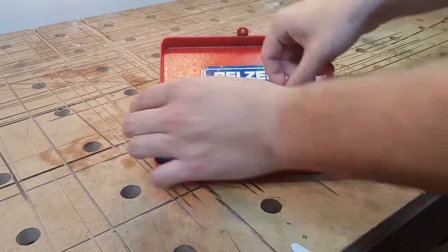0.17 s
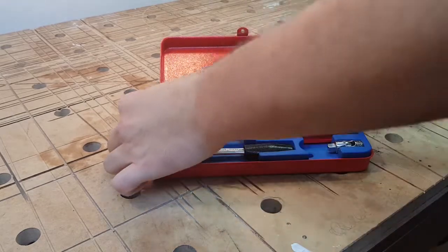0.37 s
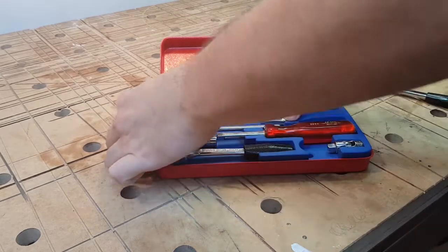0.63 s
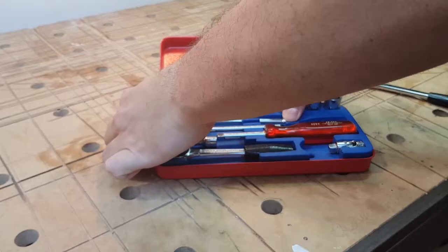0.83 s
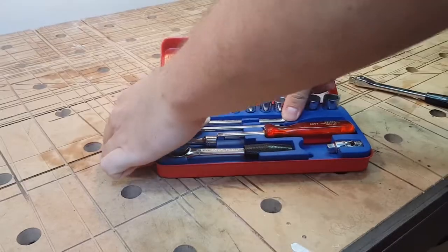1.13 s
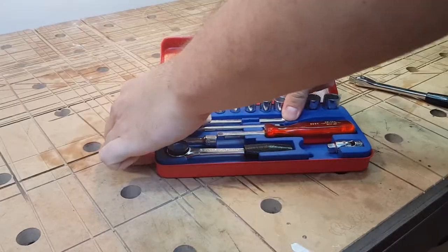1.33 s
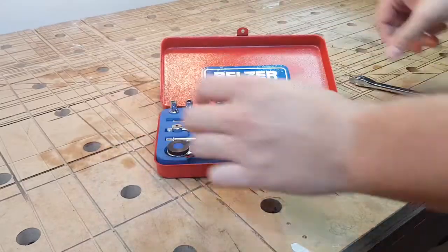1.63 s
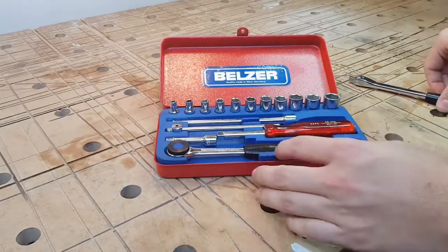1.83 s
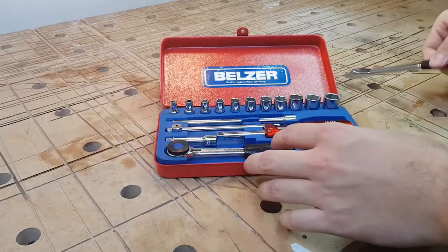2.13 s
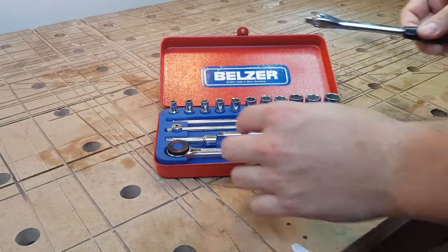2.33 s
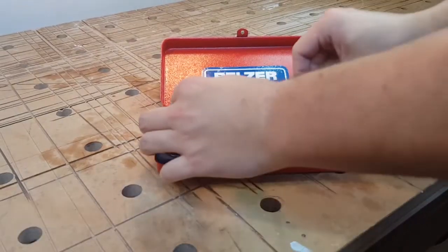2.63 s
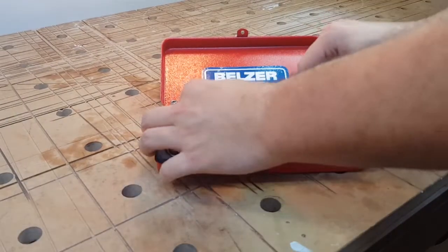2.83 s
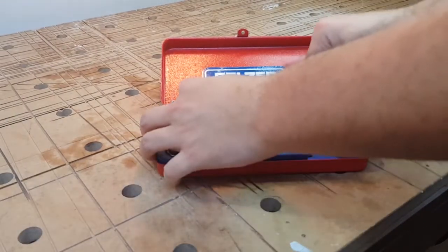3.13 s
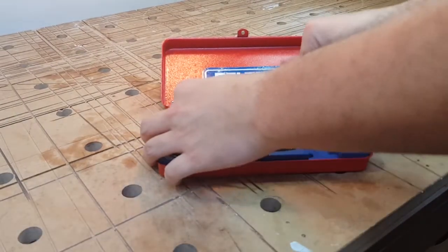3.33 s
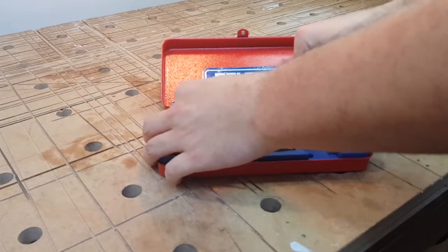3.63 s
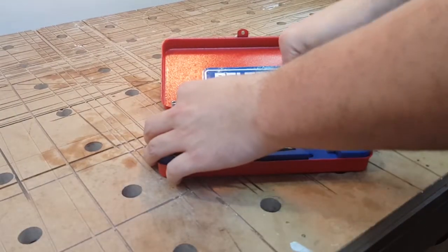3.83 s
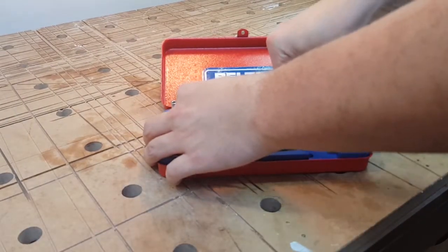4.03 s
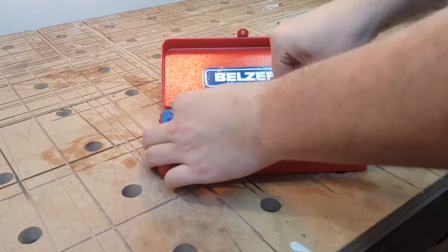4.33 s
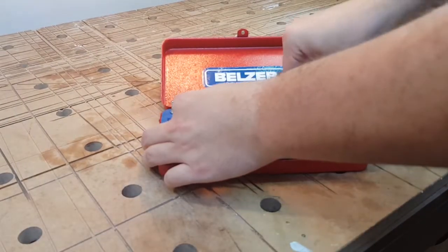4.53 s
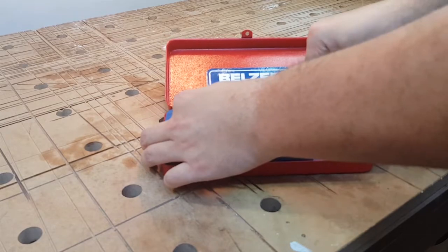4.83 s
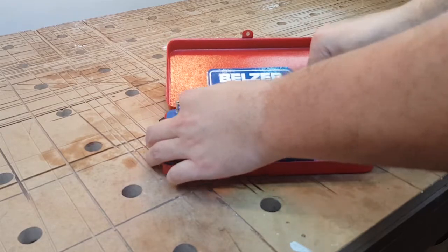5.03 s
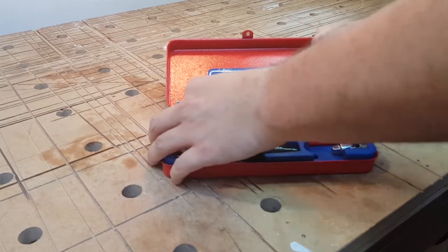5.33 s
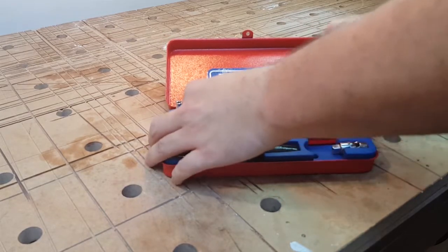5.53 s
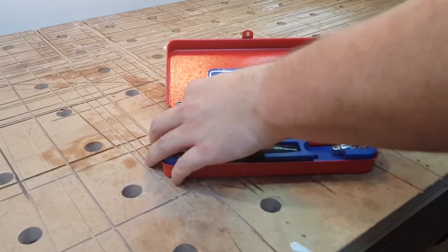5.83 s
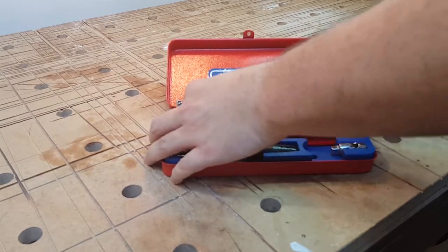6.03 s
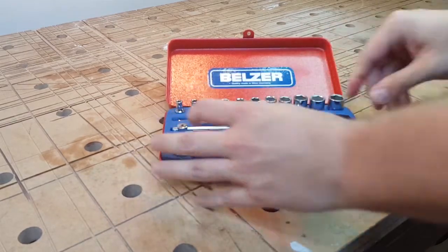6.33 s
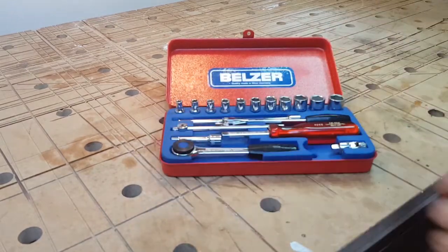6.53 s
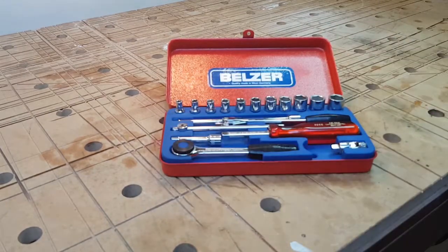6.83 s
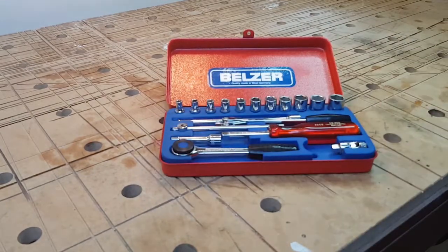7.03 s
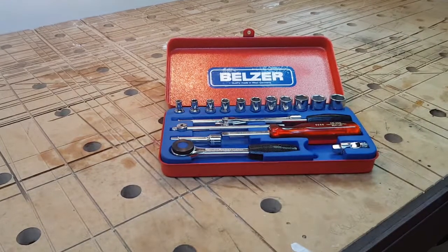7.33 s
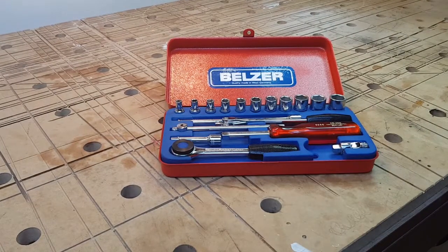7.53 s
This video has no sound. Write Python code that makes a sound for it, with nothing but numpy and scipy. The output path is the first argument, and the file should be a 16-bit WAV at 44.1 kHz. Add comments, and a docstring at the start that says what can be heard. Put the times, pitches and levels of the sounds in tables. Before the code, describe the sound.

Sparse workshop handling: a tin tool case bumps wood, a driver knocks, steel pieces clatter sharply, and tools quietly snap into a plastic tray.

```python
"""Steel sockets and a ratchet click and scrape in the plastic tray of a tin case on a wooden bench.
Each contact is a noisy force that rings bench, case, lid, handles, tray and steel; parts near its pitch
answer most. The case bumps the bench, a driver is lifted, and one tool drops onto the others: a bright
clatter of steel modes. Behind: skin brushing (swelling noise), one stick-slip squeak (wavering tone),
and a small workshop's shaped-noise rumble and hiss with faint hum tones."""
import sys
import numpy as np
from scipy import signal
from scipy.fft import rfft, irfft
from scipy.io import wavfile
from scipy.ndimage import uniform_filter1d

SR = 44100
rng = np.random.default_rng(int(sys.argv[2]) if len(sys.argv) > 2 else 0)


def to_wav(s):
    """Save 16-bit WAV."""
    ch = np.atleast_2d(s).T  # columns
    pcm = np.round(np.clip(ch, -1, 1) * 32767)  # PCM
    wavfile.write(sys.argv[1], SR, pcm.astype(np.int16))


N = 339040  # samples in the scene
RING = 24576  # samples in one contact's response
RING_HZ, RING_S = np.fft.rfftfreq(RING, 1 / SR), np.arange(RING) / SR
SCENE_HZ, SCENE_S = np.fft.rfftfreq(N, 1 / SR), np.arange(N) / SR
SOUND_SPEED_M_S = 343
EDGE_HZ = 15900
CASE_FLOOR_HZ = 318  # the flat floor of the case drums when it lands
SCRAPE_TRIM_DB, CLINK_TRIM_DB = -1.45, -2.0  # added to those tables' levels

# Workshop air spectrum: [freq_hz, relative_density_db_per_hz]
AIR_SPECTRUM = [(12, -49), (20, -17), (48, -9), (107, -5.5), (158, -11.5), (210, -11), (262, -15.5),
                (301, -16.5), (485, -13.5), (527, -19.5), (590, -17), (759, -20.5), (1090, -22.5),
                (13500, -32), (16000, -33.5)]
AIR_LEVEL_DB = -57
# Workshop air, left-right likeness: [freq_hz, correlation]
AIR_LIKENESS = [(60, 0.9), (150, 0.93), (380, 0.62), (950, 0.21), (2380, 0.031), (5980, 0.077),
                (15000, 0.33)]
# Hum tones: [freq_hz, level_db]
HUM_TONES = [(60, -67.5), (100, -67), (300, -72)]

# Room decay: [freq_hz, t60_s]
ROOM_DECAY = [(60, 0.54), (300, 0.3), (1000, 0.26), (4000, 0.22), (9000, 0.25), (15000, 0.11)]
# Room tail, left-right likeness: [freq_hz, correlation]
ROOM_LIKENESS = [(100, 0.94), (300, 0.93), (600, 0.83), (1200, 0.53), (2500, 0.097), (15000, 0.12)]
# Room tail tone: [freq_hz, gain_db]
ROOM_TONE = [(60, -3.5), (150, -1), (320, -4), (700, 3), (2000, -2.5), (4500, -2), (15000, -1.5)]

# Broad resonances of each part: [freq_hz, width_hz, relative_db]
BENCH_RESONANCES = [(59, 21, -8), (88, 23, -9), (114.4, 28, -2.5), (136.6, 46, -5)]
CASE_RESONANCES = [(197, 36, -21), (220, 21, 4.5), (250, 50, 1), (324.7, 48, 4), (394, 46, -5)]
LID_RESONANCES = [(438.4, 54, 7.5), (494, 54, -0.5), (562, 78, -2)]
HANDLE_RESONANCES = [(777, 125, 1), (807, 140, -3), (1020, 190, 1), (1290, 146, -2.5)]
TRAY_RESONANCES = [(1470, 300, -16), (1730, 250, -2), (1970, 140, -2.5), (2303, 460, 0.5),
                   (2980, 380, -2.5)]
STEEL_RESONANCES = [(3530, 550, 1), (4020, 630, 2.5), (4800, 1700, 2.5), (5900, 1360, -1.5),
                    (8400, 1700, -3), (13000, 5000, -18)]
PARTS = (BENCH_RESONANCES, CASE_RESONANCES, LID_RESONANCES,
         HANDLE_RESONANCES, TRAY_RESONANCES, STEEL_RESONANCES)

# Hand brushes tin and wood: [start_s, length_s, peak_level_db]
BRUSH_STROKES = [(1.298, 0.53, -68), (2.35, .4, -65), (6.15, 0.65, -60.5), (6.73, 0.12, -55.5),
                 (7.567, 0.25, -61)]
# Skin hiss spectrum: [freq_hz, relative_density_db_per_hz]
SKIN_SPECTRUM = [(300, -2), (700, -11), (1300, -1), (3000, -1.5), (6000, -3.5), (9000, -6), (15000, -13)]
# Steel sticks and slips in its slot: [start_s, length_s, pitch_hz, level_db]
SQUEAK_EVENTS = [(4.723, 0.059, 3025, -61.5)]

# Driver handle knocks on the bench: [start_s, contact_s, pitch_hz, level_db]
DRIVER_KNOCK_EVENTS = [(1.901, .01, 420, -44), (1.922, 0.0043, 520, -66), (1.948, .004, 420, -52),
                       (2.1, 0.0081, 260, -47), (2.109, 0.0047, 915, -35.5), (2.13, 0.0022, 1720, -44.5)]
# Driver drags over the bench: [start_s, length_s, pitch_hz, level_db]
DRIVER_DRAG_EVENTS = [(1.877, 0.065, 453, -41.5), (2.011, 0.063, 430, -47), (2.162, 0.051, 2130, -59)]
# Colour of the driver's plastic handle: [freq_hz, gain_db]
DRIVER_TONE = [(100, -3), (210, -9), (340, 4.5), (450, 1), (650, 4), (1200, 2), (2250, 0.5), (2900, -7),
               (5000, -9)]

# Steel strikes steel:
# [start_s, struck_spot_pitch_hz, crack_db, small_socket_db, large_socket_db, ratchet_db]
CLINK_EVENTS = [(1.403, 12100, -68, -57, -72, -80), (2.672, 7000, -42, -60, -42, -39),
                (2.679, 1460, -27, -38, -35, -60), (2.703, 1500, -29.5, -24, -39, -56),
                (2.7094, 10500, -26, -22, -38, -53), (2.7205, 705, -33.5, -33, -48, -60),
                (2.7771, 6000, -33.5, -50, -63, -40), (2.784, 8100, -32, -34, -69, -67),
                (2.787, 4400, -34, -38, -60, -64), (4.3682, 8100, -43.5, -53, -76, -44.5)]
# Crack of steel on steel: [freq_hz, relative_density_db_per_hz]
CRACK_SPECTRUM = [(240, -37), (400, 0), (607, -16), (687, -5), (839, -16.5), (921, -12), (1200, -13.5),
                  (1460, -10.5), (2590, -15), (2970, -4), (3470, -20), (4310, -7.5), (10900, -16.5),
                  (13300, -15), (16000, -12.5)]
# Ringing modes of the steel pieces: [freq_hz, relative_db, t60_s]
SMALL_SOCKET_MODES = [(12450, -10, .02), (12931, -5, .05), (13015, -2, .045), (13078, 0, .035),
                      (13184, -1, .04), (13400, -3, .02), (13840, -8, .04), (14400, -7, .02)]
LARGE_SOCKET_MODES = [(2280, 1, 0.03), (4500, -15, 0.066), (6100, -28, .04), (9150, 0, 0.044),
                      (9330, 2, 0.068), (9900, -2, 0.044), (11690, -19.5, .08)]
RATCHET_MODES = [(1113, -5, 0.16), (2140, -27, .1), (3250, -13, .04), (4550, -13, 0.083),
                 (5870, 15.5, 0.04), (6040, 9.5, 0.14), (8080, -1, 0.15), (8100, 0, 0.12), (11700, -7, .12)]

# Case bumps the bench: [start_s, contact_s, pitch_hz, level_db, bench_thud_db]
BUMP_EVENTS = [(0.314, 0.0065, 885, -31.5, -49), (0.950, 0.0057, 1700, -31.5, -36),
               (0.957, 0.0027, 4650, -18.5, -34), (0.979, 0.0017, 400, -30, -48),
               (1.811, 0.0023, 3160, -39, -59), (2.682, 0.0082, 1400, -45, -60),
               (2.716, 0.0058, 750, -43, -43), (2.738, 0.0044, 200, -47, -44.5),
               (2.788, 0.0012, 480, -47.5, -65), (4.534, 0.012, 706, -45, -46.5),
               (4.549, 0.0047, 139, -50, -55), (5.813, 0.0045, 720, -40.5, -33.5),
               (5.835, 0.0045, 724, -40, -44.5)]
# Tools scrape along their slots; the darker stroke at 0.131 s is a hand brushing past: [start_s, length_s,
# pitch_hz, level_db]
SCRAPE_EVENTS = [(0, 0.04, 1960, -57.5), (0.131, 0.29, 4140, -60.5), (1.883, .045, 4800, -58.5),
                 (3.063, 0.066, 200, -61), (3.849, 0.15, 130, -59), (4.137, .058, 2200, -56.5),
                 (4.781, 0.107, 1720, -55.5), (5.452, 0.099, 130, -59), (5.937, 0.063, 1150, -55.5)]
# Tools click in the tray: [start_s, contact_s, pitch_hz, level_db]
CLICK_EVENTS = [(0.255, 0.0047, 885, -60.5), (1.109, 0.011, 4200, -57), (1.115, 0.0087, 3860, -52),
                (1.122, 0.023, 2120, -55), (1.129, 0.0071, 760, -57.5), (1.402, 0.0034, 1930, -62),
                (2.371, 0.0018, 4700, -62), (4.114, 0.0042, 4330, -53), (4.298, 0.0019, 3760, -64),
                (4.363, 0.0043, 4200, -65), (4.369, 0.00095, 3270, -53.5), (5.01, 0.0014, 1860, -58.5),
                (5.026, 0.0069, 1980, -49), (5.036, 0.0025, 1800, -54), (5.047, 0.0018, 2100, -55.5),
                (5.052, 0.0032, 298, -55.5), (5.217, 0.0012, 1990, -66.5), (5.457, 0.0014, 3200, -64.5),
                (5.503, 0.0026, 5830, -65.5), (5.798, 0.0044, 2680, -55.5), (5.807, .005, 2780, -55.5),
                (5.814, .004, 1670, -46.5), (6.228, 0.0024, 3500, -58.5), (6.229, 0.0016, 1300, -62.5),
                (6.241, 0.0027, 2300, -65)]

# Reach of each contact into the parts: [bench_db, case_db, lid_db, handle_db, tray_db, steel_db]
DRIVER_REACH_DB = (-15, -1, -1, -7, -6, -8.5)
BUMP_REACH_DB = (-9, 0.5, -7.5, -17, -22, -20)
SCRAPE_REACH_DB = (5.5, 2.5, -0.5, -1.5, -2, -1.2)
CLICK_REACH_DB = (4.5, 4, 1.5, 1.1, 0, 0.8)
# Loss in parts pitched off the contact: [above_db_per_octave, below_db_per_octave]
DRIVER_FALL = (4.5, 3.5)
BUMP_FALL = (3, 2)
SCRAPE_FALL = (3, 1.6)
CLICK_FALL = (7, 3.5)


def amp(db):
    """Decibels to gain."""
    return 10 ** (np.asarray(db) / 20)


def evened(x, seconds=99):
    """Scales x to unit rms over its first seconds."""
    head = x[..., :int(seconds * SR) + 1]
    return x / np.sqrt(np.mean(head ** 2) + 1e-20)


def read(points, hz):
    """Reads a table on a log-frequency axis."""
    f, value = np.transpose(points)
    return np.interp(np.log(hz + 1), np.log(f + 1), value)


def add(mix, start_s, sound):
    """Mixes a stereo sound in at start_s."""
    part = mix[:, max(round(start_s * SR), 0):][:, :sound.shape[1]]
    part += sound[:, :part.shape[1]]


def causal(gain):
    """Minimum-phase response of this magnitude: starts at once, then rings out."""
    cepstrum = irfft(np.log(np.maximum(gain / gain.max(), 1e-4)))
    cepstrum[1:RING // 2] *= 2
    cepstrum[RING // 2 + 1:] = 0
    return np.exp(rfft(cepstrum))


def body(resonances):
    """Frequency response of a part: the power sum of its resonances."""
    power = 0
    for f, width_hz, db in resonances:
        detuning = (RING_HZ - f) / width_hz * 1.16
        power = power + (amp(db) / (1 + detuning ** 2)) ** 2
    return causal(np.sqrt(power))


def noise_pair(likeness, size):
    """Spectra of left and right noise, correlated by band through a mid and a side part."""
    mid, side = rfft(rng.standard_normal((2, size)))
    same = np.clip(read(likeness, np.fft.rfftfreq(size, 1 / SR)), -1, 1)
    return np.sqrt((1 + same) / 2) * mid + np.sqrt((1 - same) / 2) * np.array([side, -side])


def room(wet_db, gap_s=0.0029, early_db=3, early_s=0.0038, offset_m=-0.0048):
    """Response from one spot: direct sound, dense early echoes, a tail that dies by band."""
    hz, t, z = signal.stft(irfft(noise_pair(ROOM_LIKENESS, RING)), SR, nperseg=256)
    decay = amp(-60 * t / read(ROOM_DECAY, hz)[:, None])
    tail = signal.istft(z * decay, SR, nperseg=256)[1][:, :RING]
    onset = 1 - np.exp(-RING_S / gap_s)
    early_boost = amp(early_db * np.exp(-RING_S / early_s))
    tail = tail * onset * early_boost
    # the two ports are not equally far
    direct = np.exp(-2j * np.pi * RING_HZ * np.array([[offset_m], [0]]) / SOUND_SPEED_M_S)
    return direct + amp(wet_db + read(ROOM_TONE, RING_HZ)) * rfft(evened(tail)) / np.sqrt(RING)


def contact(decay_s, chatter, corner_hz=350):
    """Spectrum of a blow: one clean push carries the bass, decaying surface chatter the rest."""
    burst = rng.standard_normal(RING) * np.exp(-RING_S / max(decay_s, 1e-4))
    highpass = 1j * RING_HZ / (1j * RING_HZ + corner_hz)
    return 1 + chatter * highpass * rfft(evened(burst)) / np.sqrt(RING)


def spot(hz, focus_db, sharpness=7):
    """The touched piece adds one resonance at its own pitch; sharpness is its Q."""
    return 1 + amp(focus_db) / (1 + 1j * sharpness * (RING_HZ / hz - hz / (RING_HZ + 1)))


def blow(contact_s, hz, focus_db, corner_hz=350):
    """Force of one knock; a slow contact chatters more."""
    return contact(contact_s, contact_s / 0.0018, corner_hz) * spot(hz, focus_db, sharpness=8.8)


def grainy_slips(size, grain_db):
    """Friction noise: random slips of uneven strength."""
    return rng.standard_normal(size) * amp(grain_db * np.minimum(rng.exponential(1, size), 5))


def drag(length_s, grain_db, fade):
    """Spectrum of a sliding force: a swell of uneven slips; fade is the tapered share."""
    stroke = signal.windows.tukey(min(int(length_s * SR), RING), fade)
    slips = grainy_slips(RING, grain_db)
    return rfft(slips[:len(stroke)] * stroke, RING)


def shares(hz, reach_db, fall):
    """Gain in dB of each part under one contact: parts nearest its pitch answer most."""
    octaves = np.array([np.log2(np.array(part)[:, 0] / hz).mean() for part in PARTS])
    above, below = np.maximum(octaves, 0), np.maximum(-octaves, 0)
    return np.array(reach_db) - fall[0] * above - fall[1] * below


def stir(parts, drive, levels_db, level_s):
    """One force rings every part, each at its own rms over the first level_s."""
    sound = sum(amp(db) * evened(irfft(drive * part), level_s) for part, db in zip(parts, levels_db))
    fade_out = np.minimum(2 * (1 - RING_S / RING_S[-1]), 1) ** 2
    return sound * fade_out


def workshop():
    """Shaped-noise rumble and hiss, plus hum tones whose phase drifts below 3 Hz."""
    air = irfft(noise_pair(AIR_LIKENESS, N) * amp(read(AIR_SPECTRUM, SCENE_HZ)), N)
    wander = rfft(rng.standard_normal((len(HUM_TONES), N))) * (SCENE_HZ < 3)
    drift = evened(irfft(wander, N))
    hum = np.zeros(N)
    for (f, db), d in zip(HUM_TONES, drift):
        hum += amp(db) * evened(np.sin(2 * np.pi * f * SCENE_S + 0.98 * d))  # drift 0.98 rad rms
    return amp(AIR_LEVEL_DB) * evened(air) + hum


def brushes(grain_db=-1.5):
    """Skin on tin and wood: friction hiss that swells and fades with each stroke."""
    swell = np.zeros(N)
    for start_s, length_s, db in BRUSH_STROKES:
        swell += amp(db) * np.sin(np.pi * np.clip((SCENE_S - start_s) / length_s, 0, 1))
    skin = rfft(grainy_slips(N, grain_db)) * amp(read(SKIN_SPECTRUM, SCENE_HZ))
    hiss = irfft(skin * rfft(irfft(room(wet_db=-7.0)), N), N)
    return swell * evened(hiss)


def squeaks(waver=0.021, octave_db=-23):
    """Stick-slip: a short, nearly pure tone of unsteady pitch; waver is its relative rms."""
    out = np.zeros((2, N))
    for start_s, length_s, hz, db in SQUEAK_EVENTS:
        wander = evened(uniform_filter1d(rng.standard_normal(RING), size=150))
        angle = 2 * np.pi * np.cumsum(hz * (1 + waver * wander)) / SR
        swell = np.sin(np.pi * np.minimum(RING_S / length_s, 1))
        tone = (np.sin(angle) + amp(octave_db) * np.sin(2 * angle)) * swell
        add(out, start_s, amp(db) * evened(irfft(rfft(tone) * room(wet_db=1)), length_s))
    return out


def driver(parts):
    """A lifted driver knocks and drags on the bench, coloured by its plastic handle."""
    out = np.zeros((2, N))
    for start_s, contact_s, hz, db in DRIVER_KNOCK_EVENTS:
        drive = blow(contact_s, hz, focus_db=7) * room(wet_db=7.0)
        add(out, start_s, stir(parts, drive, db + shares(hz, DRIVER_REACH_DB, DRIVER_FALL), level_s=0.057))
    for start_s, length_s, hz, db in DRIVER_DRAG_EVENTS:
        drive = drag(length_s, grain_db=4.0, fade=0.26) * spot(hz, focus_db=1) * room(wet_db=2)
        add(out, start_s, stir(parts, drive, db + shares(hz, DRIVER_REACH_DB, DRIVER_FALL), length_s))
    return irfft(rfft(out) * amp(read(DRIVER_TONE, SCENE_HZ)), N)


def ringing(modes):
    """Spectrum of struck steel: decaying sines, favoured differently by each blow."""
    ring = np.zeros(RING)
    for f, db, t60_s in modes:
        level_db = db + 0.33 * rng.standard_normal() - 60 * RING_S / t60_s
        ring += amp(level_db) * np.sin(2 * np.pi * f * RING_S)
    return rfft(ring)


def clinks(socket_right_db=3.0):
    """Steel on steel: a wide crack, and the ring of two sockets and the ratchet."""
    out = np.zeros((2, N))
    crack = causal(amp(read(CRACK_SPECTRUM, RING_HZ)))
    beam = amp(socket_right_db * np.array([[-1], [1]]))  # small socket's high ring beams right
    for start_s, hz, *levels_db in CLINK_EVENTS:
        drive = contact(decay_s=0.0013, chatter=3.2) * spot(hz, focus_db=4) * room(wet_db=3.0)
        small_socket = beam * ringing(SMALL_SOCKET_MODES)
        pieces = [crack, small_socket, ringing(LARGE_SOCKET_MODES), ringing(RATCHET_MODES)]
        add(out, start_s, stir(pieces, drive, levels_db, level_s=0.0095))
    return out


def bumps(parts):
    """The case rocks under the hands and lands: its floor drums, its weight thuds into the bench."""
    out = np.zeros((2, N))
    drum = spot(CASE_FLOOR_HZ, focus_db=5.0, sharpness=3.1)
    for start_s, contact_s, hz, db, thud_db in BUMP_EVENTS:
        drive = blow(contact_s, hz, focus_db=5.0, corner_hz=695) * drum * room(wet_db=2.0)
        add(out, start_s, stir(parts, drive, db + shares(hz, BUMP_REACH_DB, BUMP_FALL), level_s=0.021))
        add(out, start_s, stir(parts[:1], room(wet_db=-1.0), [thud_db], level_s=0.028))
    return out


def scrapes(parts):
    """Tools slide along the tray, the case shifts on the bench, and once a hand brushes past: friction noise
    rings the parts."""
    out = np.zeros((2, N))
    for start_s, length_s, hz, db in SCRAPE_EVENTS:
        drive = drag(length_s, grain_db=4.5, fade=0.23) * room(wet_db=-3)
        add(out, start_s, stir(parts, drive, db + shares(hz, SCRAPE_REACH_DB, SCRAPE_FALL), length_s))
    return out


def clicks(parts):
    """Tools snap into and out of their tray seats: short pitched blows ring the parts."""
    out = np.zeros((2, N))
    for start_s, contact_s, hz, db in CLICK_EVENTS:
        drive = blow(contact_s, hz, focus_db=9.5) * room(wet_db=2.0)
        add(out, start_s, stir(parts, drive, db + shares(hz, CLICK_REACH_DB, CLICK_FALL), level_s=0.047))
    return out


def scene():
    """All the handling over the workshop's background."""
    parts = [body(part) for part in PARTS]
    background = workshop() + brushes() + squeaks()
    steel = amp(CLINK_TRIM_DB) * clinks()
    tray = amp(SCRAPE_TRIM_DB) * scrapes(parts) + clicks(parts)
    return background + driver(parts) + steel + bumps(parts) + tray


def record(dry):
    """Band limit: linear-phase low-pass at EDGE_HZ."""
    lowpass = signal.firwin(511, EDGE_HZ, window=("kaiser", 9), fs=SR)
    return signal.oaconvolve(dry, lowpass[None], "same")


dry = scene()
out = record(dry)
to_wav(out)
```